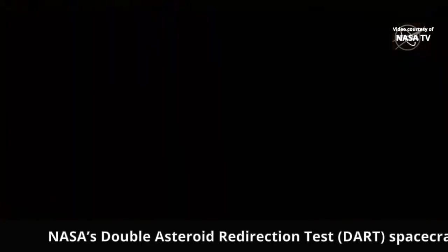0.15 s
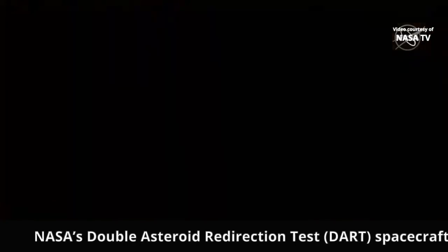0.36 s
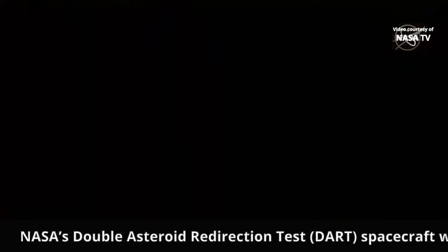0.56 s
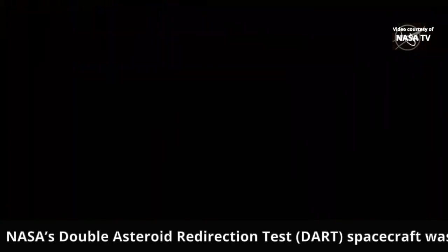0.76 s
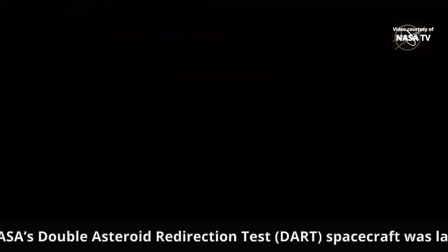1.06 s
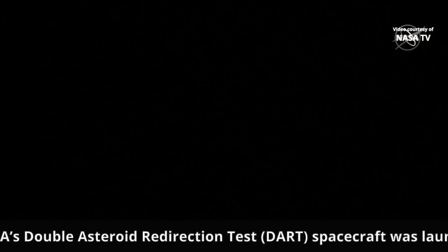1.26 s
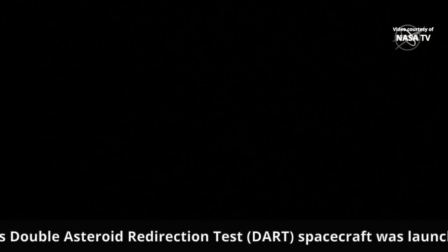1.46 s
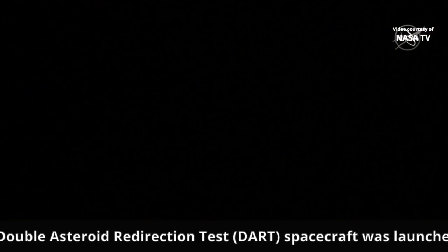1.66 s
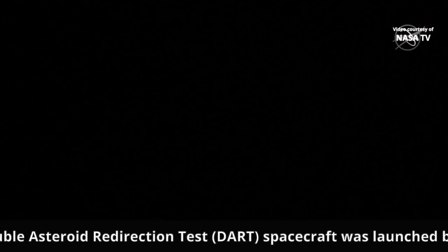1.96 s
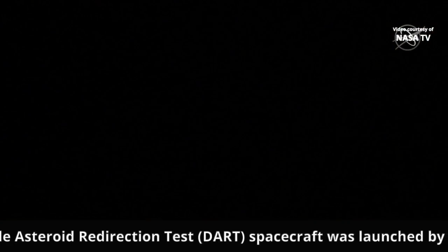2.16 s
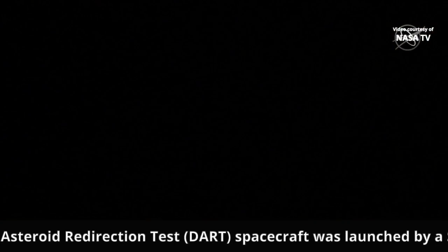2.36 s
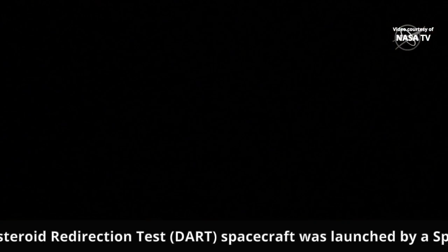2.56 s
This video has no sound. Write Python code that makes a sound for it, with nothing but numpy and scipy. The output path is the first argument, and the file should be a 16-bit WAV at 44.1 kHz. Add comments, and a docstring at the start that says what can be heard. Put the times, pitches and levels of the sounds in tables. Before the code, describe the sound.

Wind buffets the microphone on open ground, overloading it into sharp crackling pops over a distant rocket's deep rumble. The gusts ease, lull, then return weaker with a few more pops, a faint hiss and brief thin whistles behind them.

```python
"""A far rocket launch at night, heard on open ground through a microphone on the left channel.
It opens with a deep rumble, a faint hiss and a thin high whistle. From 0.2 s, strong gusts of swirling
air beat on the microphone and overload it into a crackle of sharp pops. Near 0.7 s they ease and the
whistle returns. After a lull around 1.5 s come weaker gusts, one more short whistle and a last few pops."""
import sys
import numpy as np
from scipy import signal
from scipy.fft import rfft, irfft
from scipy.io import wavfile
from scipy.ndimage import uniform_filter1d, map_coordinates

SR = 44100
rng = np.random.default_rng(int(sys.argv[2]) if len(sys.argv) > 2 else 0)


def persist_wave(psi):
    """Save psi, clipped to +-1, as 16-bit WAV."""
    counts = np.round(np.clip(psi, -1, 1) * 32767).astype(np.int16)
    wavfile.write(sys.argv[1], SR, np.atleast_2d(counts).T)


N = 119070  # 2.7 s
T = np.arange(N) / SR

# A spectrum says how strong low and high pitches are, compared with each other.
# loudness of the far hiss: time_s, level_db
HISS_LOUDNESS = [(0, -49), (.17, -52.5), (.23, -36.5), (.4, -39), (.6, -45.5), (.9, -54.5), (1.1, -55),
                 (1.2, -54.5), (1.5, -52), (1.72, -46.5), (2.0, -46.5), (2.27, -47.5), (2.37, -43.5),
                 (2.5, -49.5), (2.7, -49)]
# spectrum of the hiss: pitch_hz, level_db
HISS_SPECTRUM = [(200, 2), (500, 0), (900, -3.5), (1180, 6), (1450, -7.5), (1800, -6), (2300, 0),
                 (3100, -12), (4200, -10), (5400, -15), (6500, -24), (7800, -40), (11000, -60.5)]
# thin whistles, one list of points each: time_s, pitch_hz, level_db
WHISTLE_CURVES = [
    [(.005, 2770, -44), (.025, 2814, -62.5), (.044, 2830, -39.5), (.066, 2790, -59.5), (.08, 2810, -50),
     (.1, 2785, -47.5), (.12, 2790, -58), (.19, 2740, -52)],
    [(.66, 2690, -47), (.718, 2723, -46), (.753, 2694, -46), (.775, 2680, -66), (.797, 2640, -47.5),
     (.835, 2512, -56.5), (.87, 2510, -50), (.92, 2450, -71)],
    [(2.185, 2840, -69.5), (2.208, 2850, -50.5), (2.225, 2795, -59.5), (2.25, 2850, -61)],
]
# loudness of the rumble: time_s, level_db
RUMBLE_LOUDNESS = [(0, -4), (.04, -30.5), (.10, -12), (.16, -27.5), (.23, -11.5), (.34, -12.5), (.42, -7),
                   (.55, -11.5), (.68, -29.5), (.8, -19), (.97, -15.5), (1.15, -17.5), (1.33, -33.5),
                   (1.41, -28), (1.53, -23.5), (1.6, -26.5), (1.65, -17.5), (1.70, -37), (1.77, -21.5),
                   (1.9, -13), (2.14, -30), (2.22, -30.5), (2.31, -16), (2.38, -17.5), (2.48, -16),
                   (2.58, -25), (2.7, -22.5)]
# spectrum of the rumble: pitch_hz, level_db
RUMBLE_SPECTRUM = [(8, -1), (18, 1), (29, 3.5), (43, 0.5), (68, -11.5), (120, -23), (300, -50),
                   (1000, -100)]
# restless air between the gusts: time_s, level_db
BREEZE_LOUDNESS = [(0, -26), (.05, -33), (.1, -30), (.14, -37), (.2, -23.5), (.5, -20.5), (.86, -25.5),
                   (1.0, -27), (1.13, -30.5), (1.36, -28), (1.40, -40), (1.5, -37), (1.59, -40),
                   (1.64, -28), (1.85, -28), (2.15, -29.5), (2.27, -30), (2.46, -28), (2.51, -32),
                   (2.57, -45), (2.62, -27.5), (2.7, -28.5)]
# gusts, and how fast their eddies (small swirls of air) pass: start_s, length_s, level_db, rate_hz
AIR_GUSTS = [(0.034, 0.02, -31, 193.6), (.163, 0.014, -21.5, 125.5), (0.194, 0.0078, -11.5, 217.7),
             (0.208, 0.017, -5.5, 190.3), (0.249, 0.02575, -6, 201.1), (0.304, .018, -16.5, 180.6),
             (0.33, 0.0082, -12, 220.7), (0.36, .022, -6.5, 264), (0.405, 0.02, -6.5, 292.3),
             (0.441, 0.0278, -6.5, 212.4), (0.463, 0.031, -3.5, 249.3), (0.502, .014, -12, 190.4),
             (0.517, 0.019, -6, 203.8), (0.545, 0.017, -7, 298.4), (0.567, 0.0553, -8, 290.1),
             (0.621, 0.06, -12, 274.6), (0.687, 0.02, -16, 268.3), (0.726, 0.011, -17, 218.4),
             (0.743, 0.038, -15.5, 249.6), (0.791, 0.031, -17.5, 225), (0.83, 0.024, -17, 214.8),
             (0.857, 0.029, -24, 195.7), (0.907, 0.051, -28, 169.1), (0.977, 0.023, -27.5, 159.4),
             (1.033, 0.084, -27, 163), (1.153, 0.03, -26.5, 124.7), (1.203, .15, -27.5, 100.5),
             (1.517, .05, -41.5, 138.3), (1.615, 0.052, -24, 116.8), (1.682, 0.04, -26, 214.8),
             (1.718, 0.04, -19, 190), (1.785, 0.069, -20.5, 133.8), (1.925, 0.028, -18.5, 130),
             (1.958, .11, -18, 173.3), (2.075, 0.041, -21.5, 149.1), (2.12, .04, -21, 160.1),
             (2.238, 0.04, -30.5, 121.7), (2.310, 0.029, -21.5, 100.3), (2.342, 0.04, -23.5, 145.8),
             (2.378, 0.04, -20, 174.7), (2.42, 0.046, -26.5, 111.2)]
# spectrum of eddies passing at EDDY_BASE_HZ: pitch_hz, level_db
EDDY_SPECTRUM = [(30, -6), (100, -3), (190, -2), (270, -7), (400, -12.5), (600, -23), (900, -35),
                 (1500, -70.5), (3000, -88), (8000, -120)]
# spectrum of the finer, brighter rush of air: pitch_hz, level_db
RUSH_SPECTRUM = [(60, -3), (200, -0.5), (400, -3.5), (700, -13), (1200, -21), (2400, -39), (5000, -43),
                 (9000, -61)]
# buffets, short runs of swirls: start_s, length_s, level_db, first_rate_hz, last_rate_hz
BUFFET_RUNS = [(.209, 0.016, -4, 220, 278), (.254, .026, -2.5, 215, 273), (.357, .022, 0, 225, 237),
               (0.445, .05, -5.5, 200, 247.7), (.566, .05, -7.5, 260, 296.1), (.756, .025, -10, 240, 227.3),
               (0.789, 0.042, -13, 235, 232.7), (1.25, 0.13, -25, 78, 80), (1.698, 0.023, -16.5, 190, 194),
               (1.718, .036, -9, 144.6, 92), (2.119, .045, -19.5, 77.86, 68),
               (2.311, 0.03, -13.5, 50, 60.8), (2.37, 0.039, -15.5, 72, 94.7)]
# single jolts of pressure: start_s, length_s, level_db, direction (1 pushes, -1 pulls)
PRESSURE_POPS = [(0.193, 0.0075, -8, 1), (0.24, 0.0084, 1.5, -1), (0.2483, 0.0033, -5.5, 1),
                 (0.275, 0.013, -6, 1), (0.299, 0.0061, 5, -1), (.320, 0.0097, 2, 1), (.335, 0.011, -4, -1),
                 (0.351, 0.01, -1.5, 1), (0.385, 0.0057, -10.5, -1), (0.398, 0.004, -12, 1),
                 (0.798, .002, -11.5, -1), (0.939, 0.0045, -8, -1), (1.032, 0.002, -15, -1),
                 (1.146, 0.0095, -17.5, 1), (1.433, .008, -26.5, -1), (1.506, 0.016, -18, -1),
                 (1.628, 0.0073, -18.5, 1), (1.667, .002, -5, -1), (1.766, 0.021, -15.5, -1),
                 (2.315, 0.0045, -7, 1), (2.365, 0.0061, -6, -1), (2.382, 0.0068, -6.5, 1),
                 (2.448, 0.0058, -13, 1), (2.504, 0.012, -20, 1)]
# brief dips in level (a negative depth is a lift): middle_s, half_length_s, depth_db
LEVEL_DIPS = [(0.008, 0.021, 4.5), (0.311, 0.0011, 7.5), (0.718, 0.0027, -7), (0.785, 0.0028, 4.5),
              (0.93, 0.0024, 3.5), (0.961, .007, 8), (1.049, 0.0045, 14), (1.062, .004, 7),
              (1.139, 0.0092, 19), (1.503, 0.0092, 9), (1.649, 0.016, 0.5), (2.349, 0.0026, 9)]
# short rasps in the overload: middle_s, half_length_s, level_db, pitch_hz, half_width_octaves
OVERLOAD_RASPS = [(0.211, 0.0021, -41, 3470, 0.46), (0.227, 0.0018, -46, 2380, 0.71),
                  (0.246, 0.0022, -30.5, 1360, 0.56), (0.306, 0.011, -45.5, 1380, 0.58),
                  (0.324, 0.0012, -50, 2200, 1.2), (0.336, 0.014, -56.5, 2330, 1.3),
                  (0.436, 0.017, -38, 1100, 0.65), (1.67, .003, -41, 650, .8),
                  (2.332, 0.006, -36.5, 1101, 0.2)]
# spectrum of the overload's fizz: pitch_hz, level_db
FIZZ_SPECTRUM = [(700, 9), (1500, 2), (3000, -5), (5300, -9), (8000, -25), (10000, -16), (12000, -26.5)]


def from_db(db):
    """Turns decibels into a number to multiply by."""
    return 10 ** (np.asarray(db) / 20)


def in_time(rows):
    """Joins a table's points with straight lines: one curve for each column after the time."""
    times, *columns = np.transpose(rows)
    return [np.interp(T, times, column) for column in columns]


def filtered(x, hz, kind, order=1):
    """Keeps the "low" pitches, the "high" ones or a "band"; a higher order cuts more steeply."""
    return signal.sosfilt(signal.butter(order, hz, kind, fs=SR, output="sos"), x)


def noise(spectrum, size=N):
    """Noise with the given spectrum and a typical swing of 1."""
    hz, db = np.transpose(spectrum)
    pitches = np.maximum(np.fft.rfftfreq(size, 1 / SR), 1)
    gains = from_db(np.interp(np.log(pitches), np.log(hz), db))
    x = irfft(rfft(rng.standard_normal(size)) * gains, size)
    return x / x.std()


def evened(x, share, span_s):
    """Takes a share of the chance ups and downs out of a noise's loudness; typical swing 1."""
    width = max(int(span_s * SR), 2)
    power = np.abs(signal.hilbert(x)) ** 2
    smooth_power = uniform_filter1d(uniform_filter1d(power, width), width)
    x = x / (smooth_power + 1e-9) ** (share / 2)
    return x / x.std()


def wander(hz):
    """Smooth random movement up to about the given rate; typical swing 1."""
    x = filtered(filtered(rng.standard_normal(N), hz, "low"), hz, "low")
    return x / x.std()


def hiss():
    """A faint far hiss whose lower and upper parts each flicker on their own."""
    split_hz, flicker_db = 1700, 1.57
    parts = [filtered(noise(HISS_SPECTRUM), split_hz, kind, order=2) for kind in ("low", "high")]
    flickering = sum(part * from_db(flicker_db * wander(hz=30)) for part in parts)
    return from_db(in_time(HISS_LOUDNESS)[0]) * flickering


def whistles():
    """Thin, fluttering tones that drift in pitch, mostly downward."""
    waver_share, flutter_db = 0.006, 3.5
    out = np.zeros(N)
    for curve in WHISTLE_CURVES:
        hz, db = in_time(curve)
        wavering_hz = hz * (1 + waver_share * wander(hz=130))
        tone = np.sin(2 * np.pi * np.cumsum(wavering_hz) / SR)
        sounding = (T > curve[0][0]) & (T < curve[-1][0])
        fade = uniform_filter1d(sounding.astype(float), size=300)
        out += from_db(db + flutter_db * wander(hz=130)) * fade * tone
    return out


def rumble():
    """The far rocket: slow, heavy, uneven swings of air pressure."""
    swings = evened(noise(RUMBLE_SPECTRUM), share=0.7, span_s=0.045)
    return from_db(in_time(RUMBLE_LOUDNESS)[0]) * swings


def wind():
    """Air sweeps eddies past the microphone; gusts sweep them faster and press harder."""
    EDDY_BASE_HZ = 200
    rise_cycles, fall_cycles = 1.093, 1.25  # counted in eddies, so slow gusts roll in and out softly
    breeze_hz, usual_db, octaves_per_db = 94.48, -28.5, 0.1339  # a louder breeze is also faster
    breeze_db, = in_time(BREEZE_LOUDNESS)
    power = from_db(breeze_db) ** 2
    power_times_rate = power * breeze_hz * 2 ** (octaves_per_db * (breeze_db - usual_db))
    for start, length, db, hz in AIR_GUSTS:
        rise = np.clip((T - start) * hz / rise_cycles + 0.5, 0, 1)
        fall = np.exp(-np.maximum(T - start - length, 0) * hz / fall_cycles)
        gust_power = (from_db(db) * np.sin(np.pi / 2 * rise) ** 2 * fall) ** 2
        power += gust_power
        power_times_rate += gust_power * hz
    speed = power_times_rate / power / EDDY_BASE_HZ  # the strongest gust counts most
    level = np.sqrt(power)
    # Moving through a fixed pattern faster raises its pitch.
    pattern = noise(EDDY_SPECTRUM, size=2 * N)
    eddies = map_coordinates(pattern, [np.cumsum(speed)], order=3, mode="wrap")
    rush = from_db(-25) * level ** 0.45 * speed ** 1.62 * noise(RUSH_SPECTRUM)
    return level * evened(eddies, share=0.34, span_s=0.018) + rush


def buffets():
    """Swirls shed in a row shake the microphone almost evenly; their rate glides and wobbles."""
    fade_s, wobble_share, wobble_hz, uneven_db = 0.0042, 0.16, 109.7, 2.5
    out = np.zeros(N)
    wobble = np.exp(wobble_share * wander(wobble_hz))
    for start, length, db, first_hz, last_hz in BUFFET_RUNS:
        hz = np.interp(T, [start, start + length], [first_hz, last_hz]) * wobble
        shake = np.sin(2 * np.pi * np.cumsum(hz) / SR)
        fade = np.clip(np.minimum(T - start, start + length - T) / fade_s + 0.5, 0, 1)
        out += from_db(db) * np.sin(np.pi / 2 * fade) ** 2 * shake
    return out * from_db(uneven_db * wander(wobble_hz))


def pops():
    """Jolts of pressure rise fast and fall back; strong ones push the microphone to its limit."""
    rise_s = 0.0023
    out = np.zeros(N)
    for start, length, db, direction in PRESSURE_POPS:
        age = np.maximum(T - start, 0)
        rise = 1 - np.exp(-(age / rise_s) ** 2)
        fall = np.exp(-(age / length) ** 2)
        out += direction * from_db(db) * rise * fall
    return out


def dips():
    """A volume curve that dips briefly here and there, and lifts once."""
    dip_db = sum(depth * np.exp(-((T - middle) / half) ** 4) for middle, half, depth in LEVEL_DIPS)
    return from_db(-dip_db)


def rasps():
    """The grit of the overload: tiny bursts of noise at set times."""
    out = np.zeros(N)
    for middle, half_length, db, hz, octaves in OVERLOAD_RASPS:
        band_hz = [hz / 2 ** octaves, hz * 2 ** octaves]
        band = filtered(rng.standard_normal(N), band_hz, "band", order=2)
        grit = evened(band, share=0.76, span_s=half_length)
        out += from_db(db) * np.exp(-((T - middle) / half_length) ** 2) * grit
    return out


def overload(pressure):
    """The microphone flattens big swings and fizzes as it flips between its limits."""
    limit, hardness = 0.33, 2.66
    flattened = pressure / (1 + np.abs(pressure / limit) ** hardness) ** (1 / hardness)
    steepness = uniform_filter1d(np.abs(np.gradient(flattened, axis=1)), size=60)
    flips = steepness ** 2.6  # the fastest flips fizz far more than the rest
    fizz = from_db(-54.5) * flips / flips[0].std() * noise(FIZZ_SPECTRUM)
    return flattened, fizz


def scene():
    """Air pressure at the left microphone; the idle right channel has only a trace of hiss."""
    left = rumble() + pops() + dips() * (wind() + buffets() + hiss() + whistles())
    right = from_db(-76) * noise(HISS_SPECTRUM)
    return np.array([left, right])


def record(dry):
    """The microphone overloads, then the very lowest and highest pitches are cut away."""
    treble_hz, treble_db, low_cut_hz, high_cut_hz = 2100, -1, 23, 11880
    flattened, fizz = overload(dry)
    lows = filtered(flattened, treble_hz, "low")
    out = lows + from_db(treble_db) * (flattened - lows) + fizz
    out[0] += rasps()  # left channel only
    out = filtered(out, low_cut_hz, "high")  # this tilts the flat tops of the wave
    return signal.sosfilt(signal.cheby2(12, 70, high_cut_hz, fs=SR, output="sos"), out)


dry = scene()
out = record(dry)
persist_wave(out)
```